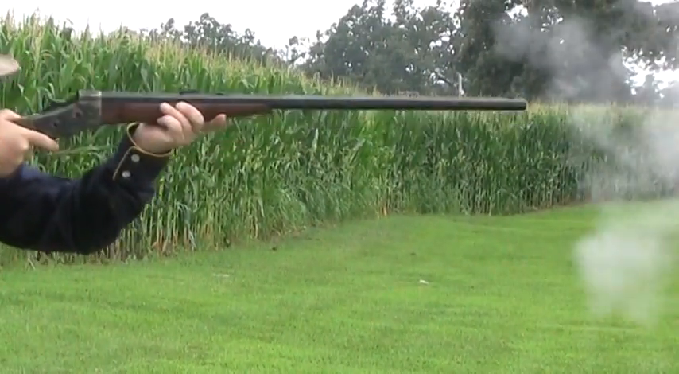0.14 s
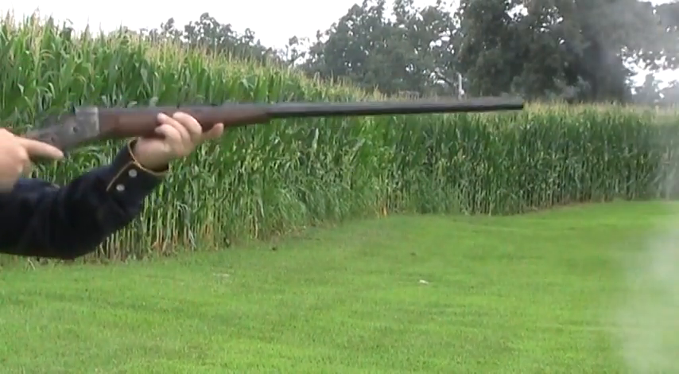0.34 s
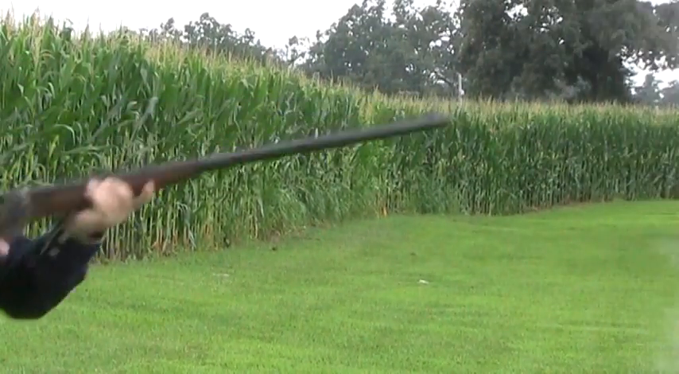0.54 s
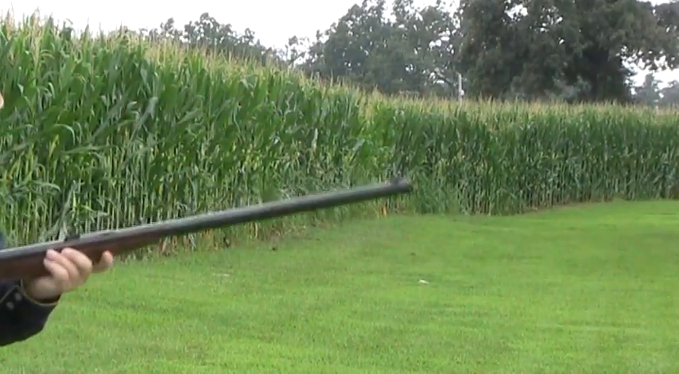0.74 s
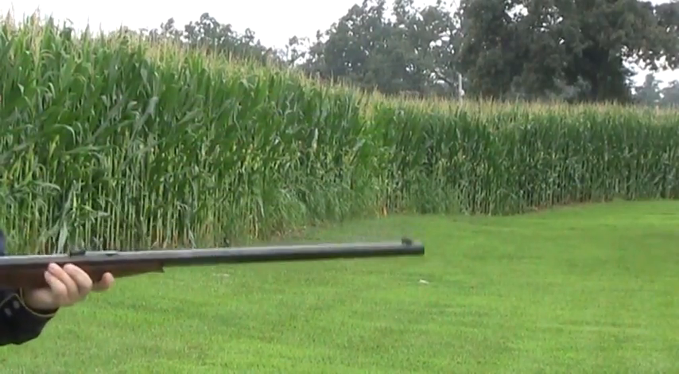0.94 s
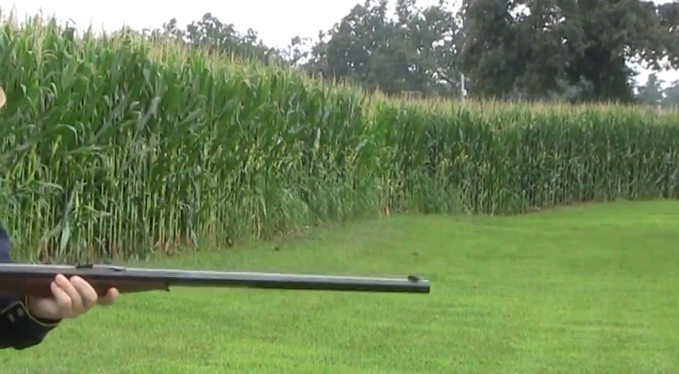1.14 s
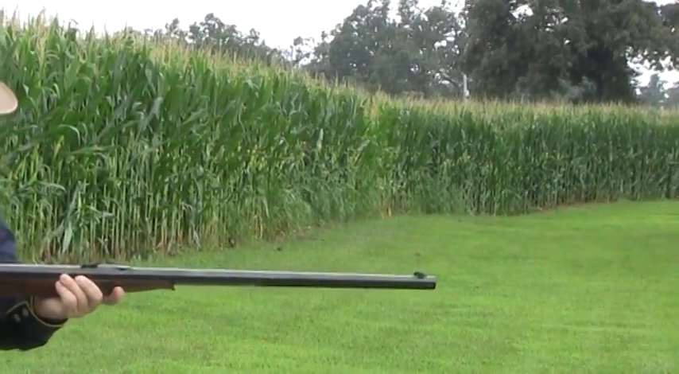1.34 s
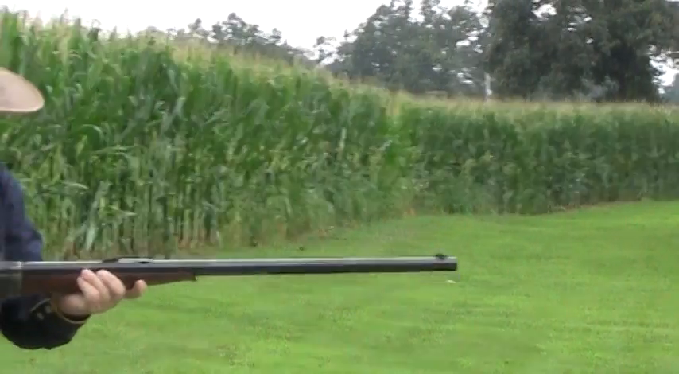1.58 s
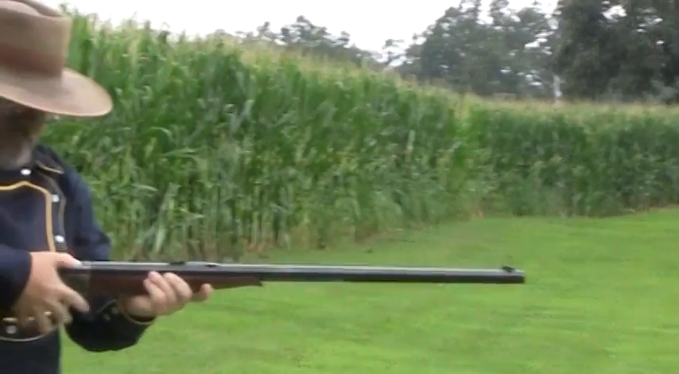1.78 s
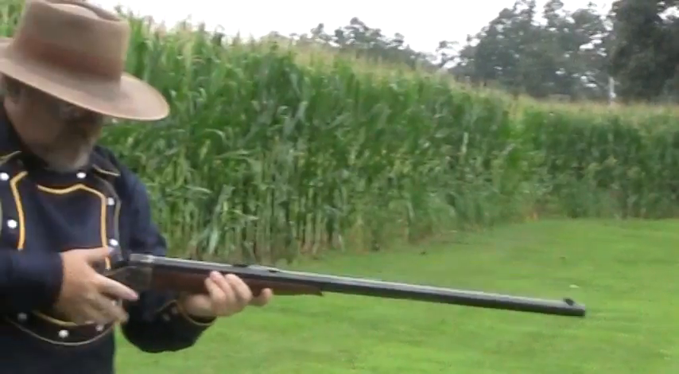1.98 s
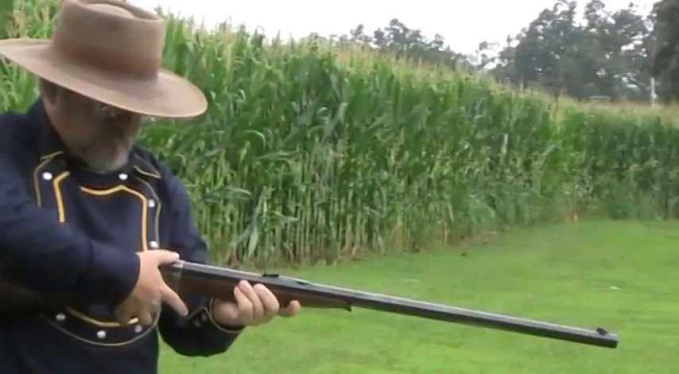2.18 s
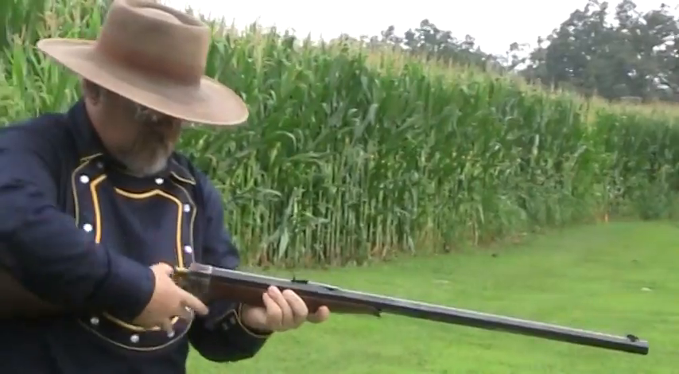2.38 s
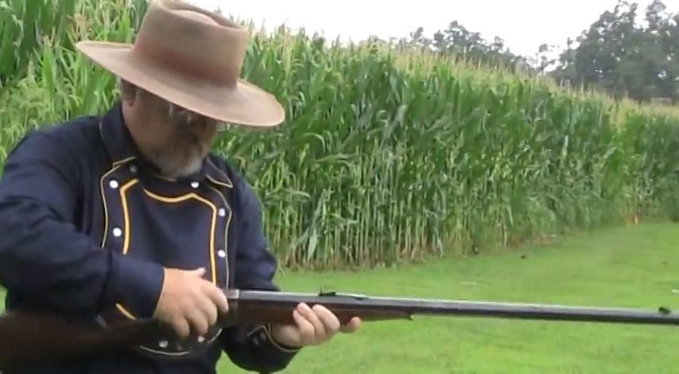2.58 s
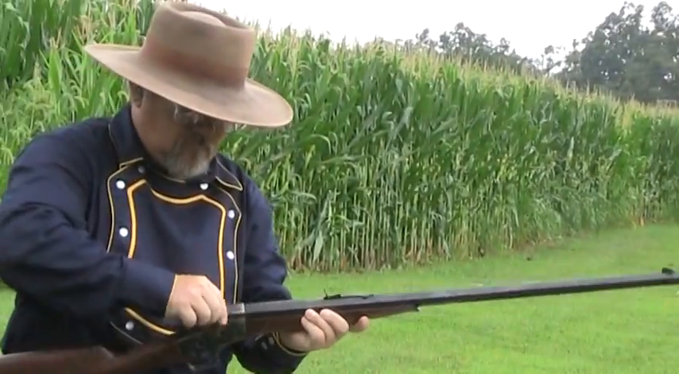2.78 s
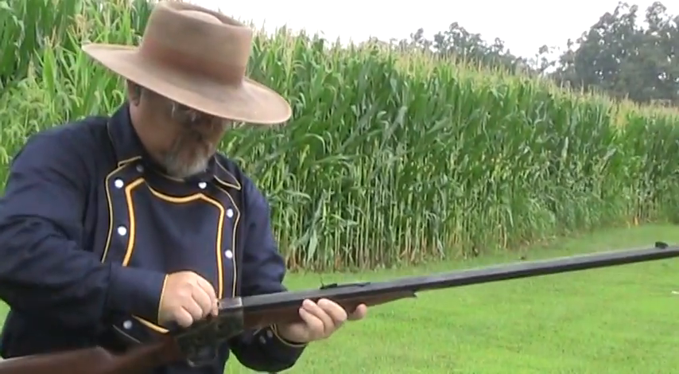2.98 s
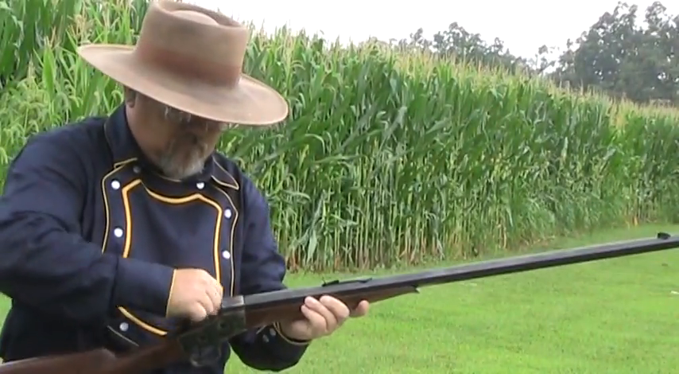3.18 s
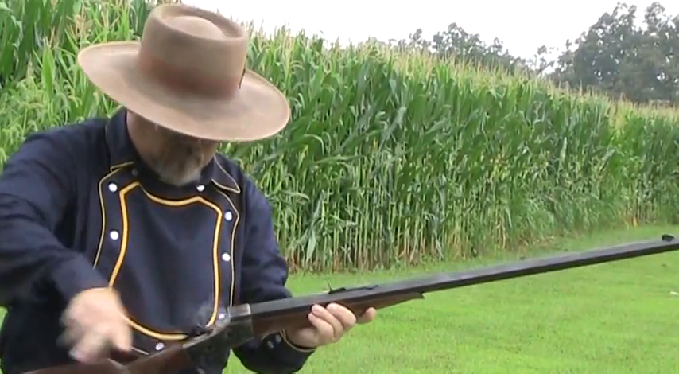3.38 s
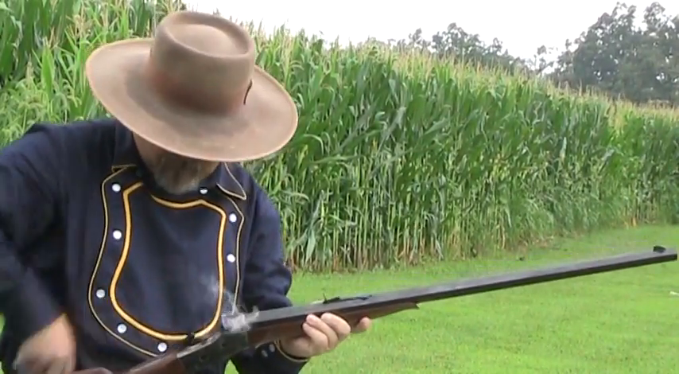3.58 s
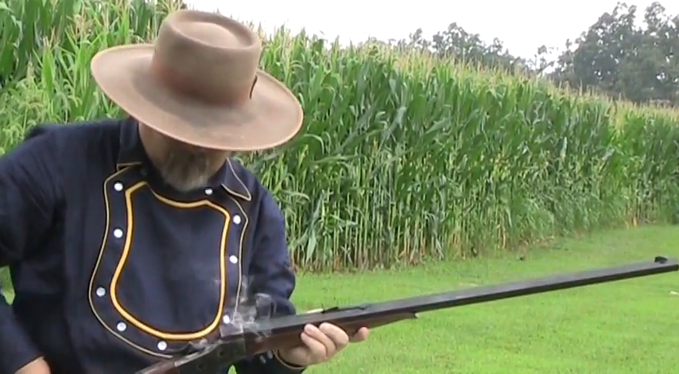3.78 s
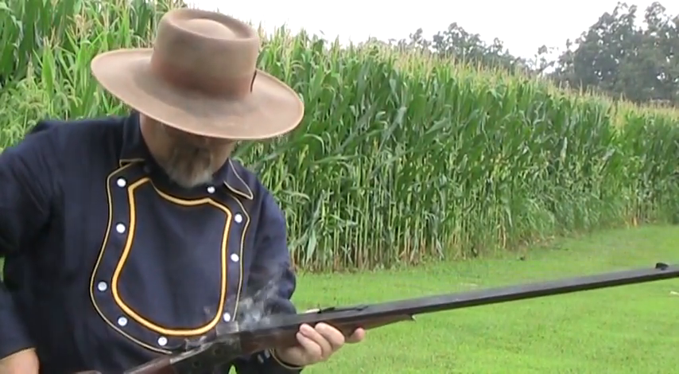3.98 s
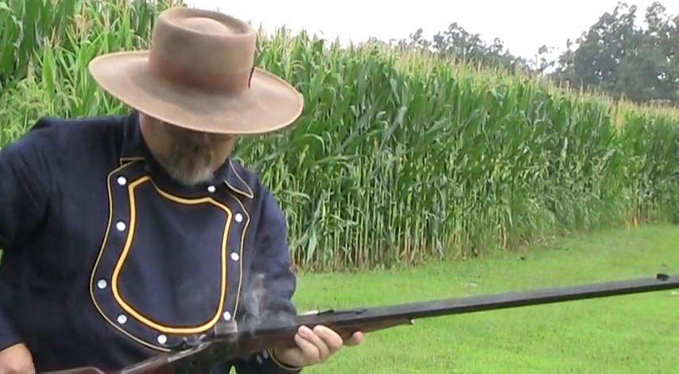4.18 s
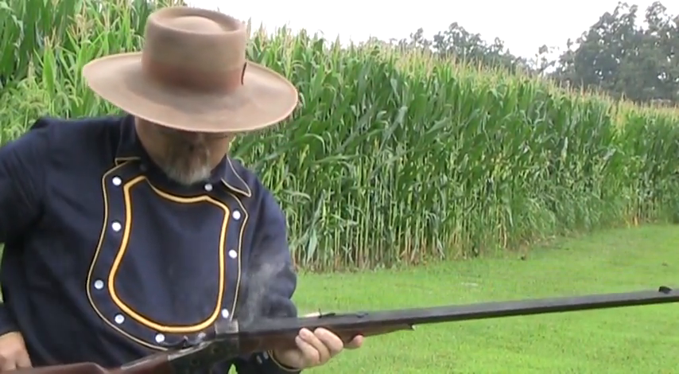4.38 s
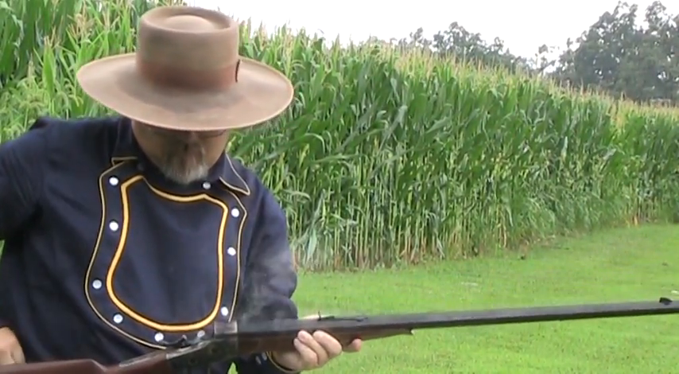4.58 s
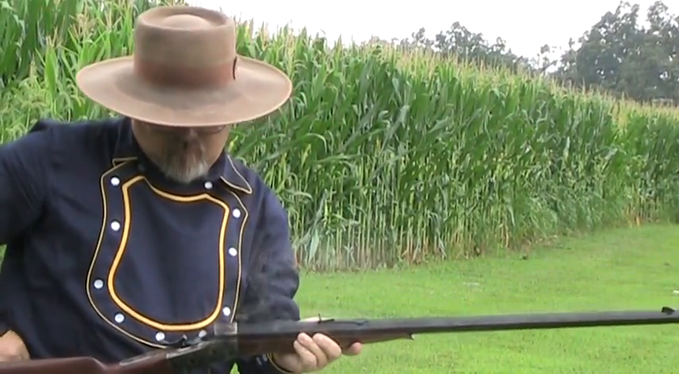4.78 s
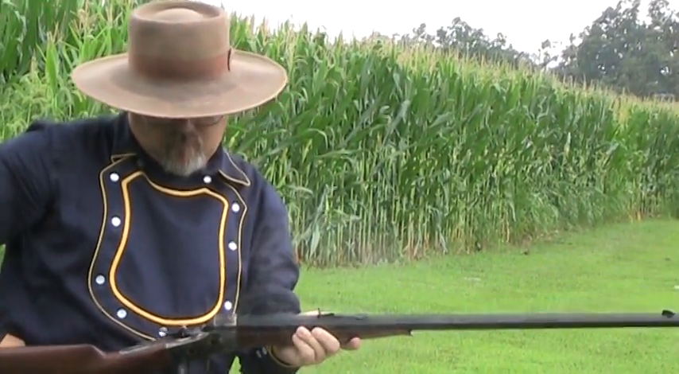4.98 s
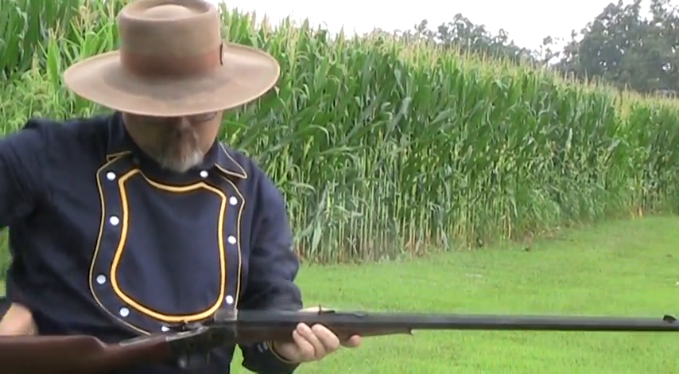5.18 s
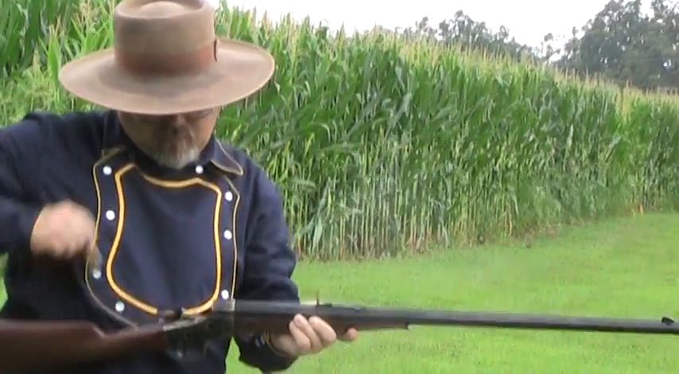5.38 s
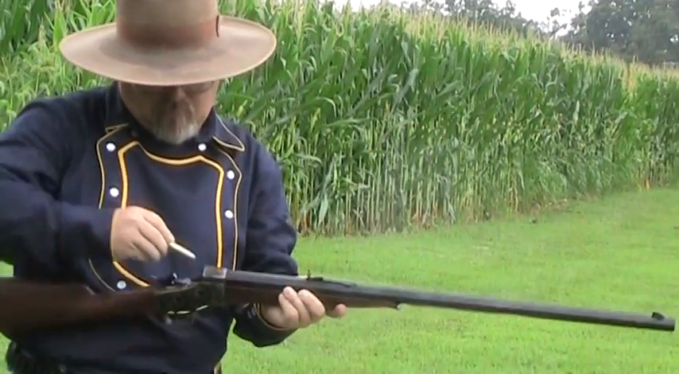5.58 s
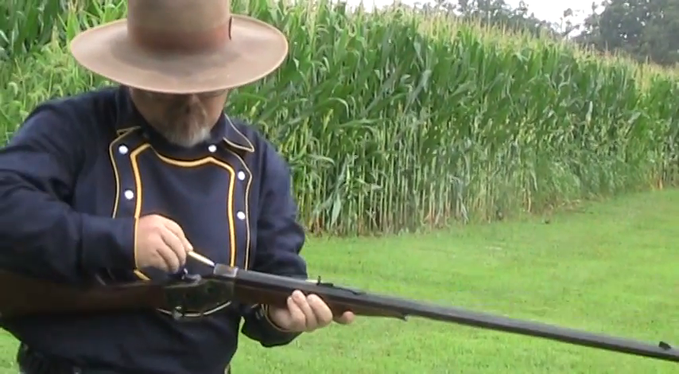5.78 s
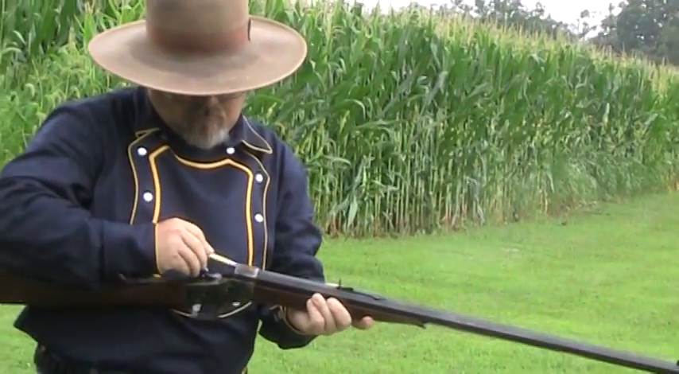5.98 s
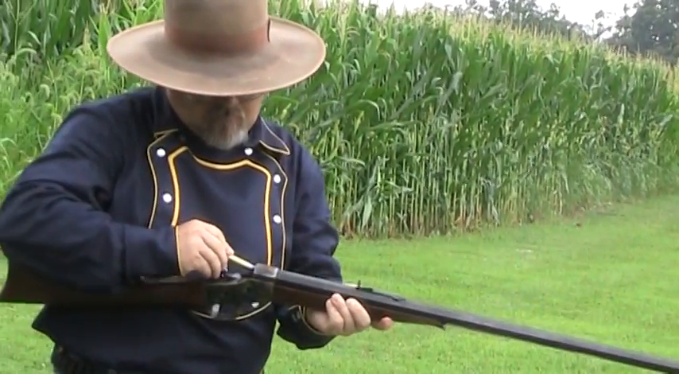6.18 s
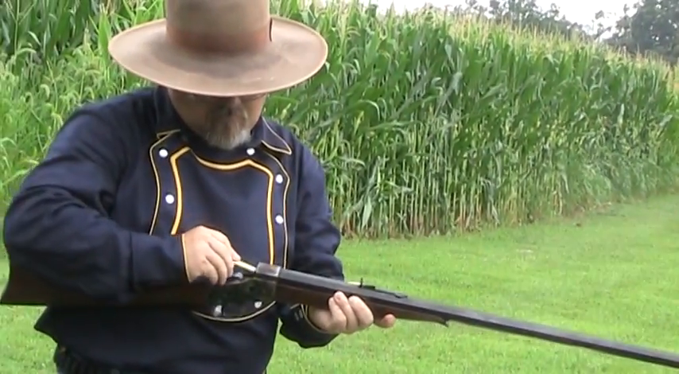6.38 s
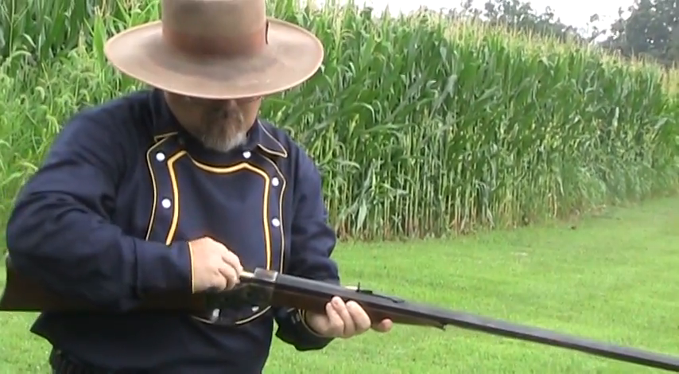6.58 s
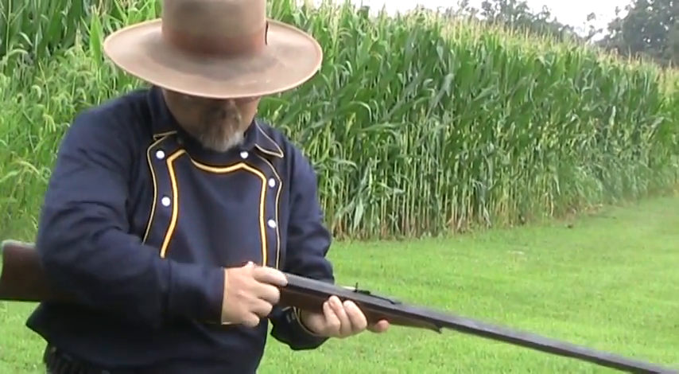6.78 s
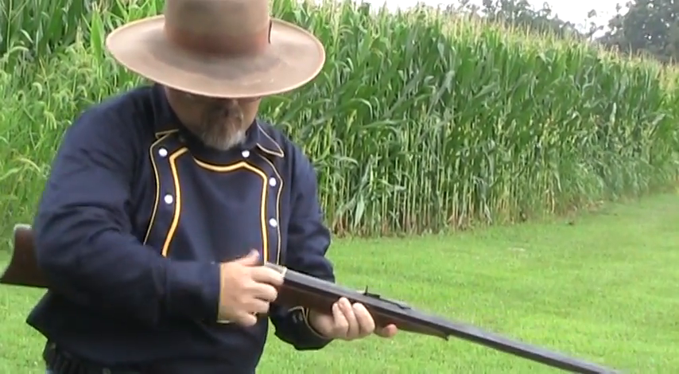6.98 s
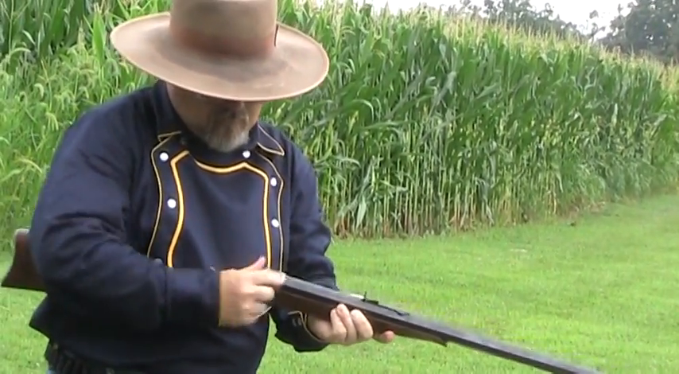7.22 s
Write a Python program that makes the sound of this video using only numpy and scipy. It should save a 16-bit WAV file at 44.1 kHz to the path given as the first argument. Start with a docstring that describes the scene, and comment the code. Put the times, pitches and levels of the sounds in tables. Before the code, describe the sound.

An open grassy field, heard through a small stereo camera microphone with soft wide hiss, a very faint distant hum and quiet pulsing katydids and crickets. At 0.2 seconds one close rifle shot cracks, harsh and clipped flat, with a brief sinking boom. Around 0.35 a short bright steel-target clank lands among hard slaps; dense echoes roll from crops and trees, swelling unevenly near 0.5, 0.75, 1.1 and 1.4, losing treble and fading by 2.4. Crisp action clicks cut through at 1.4 and 1.55, then a strong steel clack at 2.5. At 3.4 metal snaps and the brass case tinks, with a small dull grass thud at 3.9. Faint gliding bird whistles run from 4 to 6, after a lone one at 2. Subtle sliding and rustling begin at 6, with light reload clicks at 6.2, 6.7 and a ringing clack at 6.9, ending near 7.

```python
"""At the edge of a corn field, one rifle shot overloads a small stereo camera microphone. The shot is bursts of noise
and a sinking tone. The bullet rings a steel target, made of dying sines, and noise echoes roll back from crop rows
and far trees. The shooter works the steel action, pulls the brass case and loads again: scrapes and ringing metal.
Behind are katydids and crickets (pulsed hiss), a songbird (gliding sines), soft hiss and a distant hum."""
import sys
import numpy as np
from scipy import signal
from scipy.fft import rfft, irfft
from scipy.io import wavfile
from scipy.ndimage import uniform_filter1d

SR = 44100
rng = np.random.default_rng(int(sys.argv[2]) if len(sys.argv) > 2 else 0)


def transcribe(signal):
    """Save signal, clipped to [-1, 1], as a 16-bit WAV file at the path in sys.argv[1]."""
    frames = np.atleast_2d(signal).T
    limited = np.clip(frames, -1, 1)
    pcm = np.round(limited * 32767).astype(np.int16)
    wavfile.write(sys.argv[1], SR, pcm)


def makeup_ratio(level_db):
    """Linear amplitude ratio for a level in decibels (20 dB per factor of ten)."""
    decades = np.asarray(level_db, float) / 20
    return 10 ** decades


N = 319725
T = np.arange(N) / SR  # time of every sample, s
LR = np.array([[1.], [-1.]])  # puts a signal into left and right with opposite signs

# Rolling echo of the field, level of its middle pitches: t/s, level/dB
ROLL_MIDDLE = [(0.21, -11.5), (0.24, -25), (0.285, -21.5), (0.31, -15), (0.335, -15), (0.37, -29.5),
               (0.43, -25), (0.51, -18), (.55, -23.5), (.59, -21), (0.66, -21), (0.729, -29), (0.733, -21),
               (.8, -22), (0.92, -24), (1.05, -19), (1.2, -19), (1.34, -26), (1.44, -24), (1.5, -28.5),
               (1.77, -37.5), (1.83, -33.5), (1.86, -39.5), (2.45, -59.5)]
# Level of its treble, which air takes away as the path grows: t/s, level/dB
ROLL_TREBLE = [(0.21, -25), (0.3, -28), (0.38, -24.5), (0.602, -29), (0.73, -38), (0.731, -27), (0.92, -40),
               (1.02, -33.5), (1.4, -53.5), (1.78, -59), (1.83, -54.5), (1.87, -63.5), (2.449, -91)]
# Level of its bass: t/s, level/dB
ROLL_BASS = [(0.204, -13.5), (0.28, -37.5), (0.311, -15.5), (0.46, -41), (0.51, -28), (0.6, -37.5),
             (0.9, -39.5), (1.7, -41.5), (2.449, -69.5)]
# Tone colour of the rolling echo: f/Hz, relative level per Hz/dB
ROLL_COLOUR = [(50, -8), (150, 6.5), (350, -0.5), (1100, 0), (2000, -1), (3500, -1.5), (6000, -8),
               (8500, -8), (12500, -41)]
# Single slaps from hard surfaces: t/s, peak level before panning/dB, centre f/Hz
SLAPS = [(.262, -7.5, 1500), (0.2963, -2, 1280), (0.3225, -5, 680), (0.330, -7.5, 770), (0.3486, 5, 1880),
         (0.3907, 0, 1030), (0.4125, 0, 999), (0.4264, -2.5, 1248), (0.733, -11, 2620), (0.744, -7.5, 1620),
         (1.018, -6.5, 970), (1.026, -6.5, 1040), (1.051, -8, 1030), (1.08, -5, 1010), (1.101, -10, 1060),
         (1.156, -6.5, 1110), (1.423, -8, 980)]
# Ringing tones of the steel plate: f/Hz, relative level/dB, time to fall by 60 dB/s
TARGET_MODES = [(3680, -12.5, 0.21), (5350, 0, 0.039), (7300, -18.5, 0.17), (8700, -21, 0.08)]
# The hit and its two duller echoes: t/s, peak level before panning/dB, brightness/dB per octave
TARGET_HITS = [(.349, 4, 2.5), (.511, -15.5, -22.5), (0.591, -15, -27)]
# Ringing tones of barrel and action: f/Hz, relative level/dB, time to fall by 60 dB/s
RIFLE_MODES = [(440, -18.5, 0.031), (803, -12.5, 0.27), (1062, -4.5, 0.033), (1390, -7, 0.051),
               (1774, -10, 0.022), (2205, -10.5, 0.077), (2770, -9, 0.04), (3380, -4.5, 0.026),
               (4820, -10.5, 0.0051), (6560, -11, 0.028), (7870, -3.5, 0.015), (9386, -4, 0.015),
               (12900, -17.5, 0.023)]
# Hands, block, hammer and cartridge on the rifle:
# t/s, peak level/dB, brightness/dB per octave, barrel ring/dB, favoured f/Hz
CONTACTS = [(.033, -36.5, -19, -11, 1390), (0.1815, -7.5, 0, 5, 2205), (1.3918, -8, 1.5, -15, 4820),
            (1.56, -10, 0, -8, 2205), (2.478, -37, 5, -18.5, 7870), (2.4912, -22, 2, -7, 3100),
            (2.502, -4, -0.5, -10, 2640), (2.646, -31, 0.5, 3.5, 1774), (3.118, -30.5, 0.5, 4, 1390),
            (3.4078, -12.5, 1.5, -10, 12900), (3.4137, -24, -4, -17, 2205), (3.4233, -17, -2.5, -1, 2205),
            (3.835, -40, -9, -7.5, 1062), (3.881, -32.5, 2, -17.5, 4820), (5.390, -37, -0.5, -9, 1062),
            (6.183, -23.5, -0.5, -7, 1774), (6.484, -31.5, -5, 3, 1390), (6.543, -32.5, -5.5, 4, 1390),
            (6.682, -17.5, -1.5, -9.5, 2780), (6.741, -34.5, -6.5, -5, 424), (6.887, -33, -3, 7, 1390),
            (6.9121, -21.5, 1.5, 7, 2770), (6.916, -14.5, -3.5, 9, 1390), (6.979, -38, -5.5, -17, 2205)]
# Ringing tones of the empty brass case: f/Hz, relative level/dB, time to fall by 60 dB/s
CASE_MODES = [(4064, -10, 0.2), (8730, -2.5, 0.13), (13600, -19.5, 0.14)]
# Knocks of the case: t/s, peak level/dB, brightness/dB per octave
CASE_HITS = [(3.4232, -25, 3), (3.4264, -23.5, -3), (3.438, -28, -4.5)]
# The case lands in the grass: t/s, level/dB, f/Hz
THUD = (3.888, -25, 354)
# Fingers and brass slide on the steel: start t/s, length/s, gain of the ringing ticks/dB, favoured f/Hz
SLIDES = [(2.453, 0.055, -39.5, 803), (5.356, 0.069, -51, 1062), (6.02, 0.41, -60, 803),
          (6.479, 0.11, -47.5, 1390), (6.807, 0.078, -48.5, 803)]
# Faint rustle of sleeve or leaves: start t/s, length/s, level before its swell/dB, f/Hz
RUSTLES = [(6.032, 0.089, -58, 4600), (6.814, 0.09, -57.5, 4140), (7.109, 0.12, -56.5, 4740)]
# The repeated falling note of the bird: length/s, start f/Hz, end f/Hz
FALLING_NOTE = (0.054, 4500, 3400)
# Its other notes: t/s, length/s, start f/Hz, end f/Hz, level before panning and flutter/dB
OTHER_NOTES = [(2.038, 0.15, 3364, 3314, -66.5), (4.456, 0.021, 3120, 3130, -63.5),
               (4.915, 0.059, 6300, 3610, -60), (5.043, 0.046, 3630, 4125, -54),
               (5.212, 0.055, 5910, 3325, -61.5), (5.328, 0.065, 3500, 4136, -56.5),
               (5.495, 0.095, 3500, 5750, -63), (5.63, 0.044, 4900, 5750, -59.5),
               (5.705, .04, 5680, 5750, -59.5), (5.645, 0.064, 3460, 5265, -57.5),
               (5.775, 0.065, 4600, 5780, -65), (5.846, 0.021, 4693, 3170, -55.5),
               (5.917, 0.068, 3106, 3240, -61)]
# Phrases of the near katydid: first t/s, until t/s, spacing/s
NEAR_KATYDID = [(.045, .1, .25), (1.48, 2.85, .257), (3.11, 6.15, .248), (6.275, 7.3, .2235)]
# Phrase of the second katydid: first t/s, until t/s, spacing/s
SECOND_KATYDID = [(1.88, 7.3, .2345)]
# Phrase of the far katydid: first t/s, until t/s, spacing/s
FAR_KATYDID = [(.23, 7.3, .247)]
# Cricket choruses: f/Hz, width/Hz, pulses per s, level/dB
CRICKETS = [(4700, 350, 62, -67), (6300, 750, 140, -67)]
# Bands of the distant hum: f/Hz, width/Hz, level/dB
HUM_BANDS = [(234.8, 10, -58.5), (141, 24, -66)]
# Tone colour of air and microphone hiss, part shared by both sides: f/Hz, relative level per Hz/dB
HISS_SHARED = [(40, -12), (100, -3), (250, -8), (600, -13), (1800, -20.5), (6800, -28), (7300, -31),
               (10300, -33), (11000, -40), (15500, -42), (16500, -79)]
# Opposed part of the hiss over its shared part: f/Hz, level/dB
HISS_OPPOSED = [(100, -1.5), (600, 4.5), (5000, 2.5)]


def level(x, db):
    """Scale a sound to a given average (rms) level."""
    return x * makeup_ratio(db) / np.sqrt(np.mean(x ** 2))


def band(x, hz, width_hz):
    """Keep only the pitches around a centre."""
    middle = np.hypot(hz, width_hz / 2)
    edges = np.clip([middle - width_hz / 2, middle + width_hz / 2], 10, .48 * SR)
    return signal.sosfilt(signal.butter(2, edges, "bandpass", fs=SR, output="sos"), x)


def colour_db(points, hz):
    """Read a tone colour between its points, with pitch counted in octaves."""
    f, db = np.transpose(points)
    return np.interp(np.log(np.maximum(hz, 1)), np.log(f), db)


def coloured(db_of_hz):
    """Steady noise with a given tone colour."""
    spectrum = rfft(rng.standard_normal(N))
    return irfft(spectrum * makeup_ratio(db_of_hz(np.fft.rfftfreq(N, 1 / SR))), N)


def add(out, s, x):
    """Mix a sound in at a given time."""
    i = int(s * SR)
    n = min(x.shape[-1], N - i)
    out[..., i:i + n] += x[..., :n]


def spread(x, pan_db, lag):
    """Two microphone openings: they differ in level, and the left one hears the sound lag samples later."""
    return np.array([np.roll(x, lag) * makeup_ratio(pan_db / 2), x * makeup_ratio(-pan_db / 2)])


def ring(modes, gains_db, length=.35):
    """Ringing metal: dying sines, each gently pulsing in loudness from a random start; highest peak is 1."""
    t = np.arange(int(length * SR))[:, None] / SR
    hz, db, t60 = np.transpose(modes)
    beat_hz = 40 * rng.random(len(hz))
    beat = 1 + 0.36 * np.sin(2 * np.pi * (beat_hz * t + rng.random(len(hz))))
    decay = np.exp(-np.log(1000) * t / t60)
    tones = np.sin(2 * np.pi * (hz * t + rng.random(len(hz))))
    x = (beat * makeup_ratio(db + gains_db) * decay * tones).sum(axis=1)
    return x / np.abs(x).max()


def struck(modes, hits, stops=False):
    """A metal thing struck at listed moments; with stops, each contact silences the ring before it."""
    out = np.zeros(N)
    for s, db, bright_db in hits:
        stopped = np.clip((T - s) / 0.0036 + 1, 0, 1)  # fades the old ring over the last 3.6 ms
        out = out * (1 - stops * stopped)
        gains_db = bright_db * np.log2(np.array(modes)[:, 0] / 5000)
        add(out, s, makeup_ratio(db) * ring(modes, gains_db))
    return out


def favour_db(hz, favoured_hz):
    """The spot that is hit lifts the ringing tones near one pitch, by up to 10 dB."""
    width_octaves = .15
    return 10 * np.exp(-(np.log2(hz / favoured_hz) / width_octaves) ** 2)


def shot():
    """Turbulent muzzle gas: a bright crack, then a cloud whose boom sinks in pitch as it grows."""
    start_s, gain_db = .187, 24.5
    t = np.arange(int(.12 * SR)) / SR
    gas = rng.standard_normal((3, len(t)))
    crack = level(band(gas[0] + 0.67 * LR * gas[1], 3000, 7500), 0)
    crack = crack * (np.exp(-t / 0.0035) + makeup_ratio(-33) * np.exp(-t / 0.029))
    body = level(band(gas[2], 700, 1800), -2.5) * np.exp(-t / 0.0049)
    boom_hz = 390 + 900 * np.exp(-t / .0025)
    boom_swell = (t / 0.0076) * np.exp(1 - t / 0.0064) * np.exp(-t / 0.0043)
    boom = makeup_ratio(4.5) * np.sin(2 * np.pi * np.cumsum(boom_hz) / SR) * boom_swell
    out = np.zeros((2, N))
    add(out, start_s, makeup_ratio(gain_db) * (crack + body + boom))
    return out


def slaps():
    """Each hard surface returns the blast as a few cycles in a broad band, with a ragged tail."""
    t = np.arange(int(.03 * SR)) / SR
    out = np.zeros(N)
    for s, db, hz in SLAPS:
        blast = rng.standard_normal(len(t)) * 0.19 * np.exp(-t / 0.004)
        blast[0] = 1
        main = band(band(blast, hz, 0.51 * hz), hz, 5.1 * hz)
        upper = band(band(blast, 2.5 * hz, 2 * hz), 2.5 * hz, 2 * hz)
        x = main + makeup_ratio(-16) * upper
        add(out, s, x * makeup_ratio(db) / np.abs(x).max())
    return spread(out, -4.0, lag=1)


def roll():
    """Countless small reflections of uneven size, as noise in half-octave bands; treble comes from all sides."""
    t = T[:int(ROLL_MIDDLE[-1][0] * SR)]
    curves = (ROLL_MIDDLE, ROLL_TREBLE, ROLL_BASS)
    middle_db, treble_db, bass_db = (np.interp(t, *np.transpose(c), left=-120) for c in curves)
    clumps_db = level(uniform_filter1d(rng.standard_normal(len(t)), int(0.0056 * SR)), 0)
    clumps_db = clumps_db * np.clip(t - 0.2, .55, 1)  # far trees return lumpier echoes than crop rows
    out = np.zeros((2, N))
    for hz in 60 * 2 ** np.arange(0, 8, .5):
        noises = rng.standard_normal((2, len(t)))
        shared, opposed = (level(band(band(x, hz, hz / 2), hz, hz / 2), 0) for x in noises)
        octaves = np.log2(hz / 1400)
        tilt_db = (treble_db - middle_db) * max(octaves + 0.33, 0) / 1.944
        tilt_db = tilt_db + (bass_db - middle_db) * np.clip(-(octaves + 0.46) / 1.47, 0, 1)
        band_db = colour_db(ROLL_COLOUR, hz) + 10 * np.log10(hz / 3100)  # wider bands hold more power
        gain = makeup_ratio(clumps_db * np.clip(2.0 - 1.1 * octaves, 0, 3) + middle_db + tilt_db + band_db)
        width = np.clip(.12 + hz / 9000, 0, 1)
        add(out, 0, gain * (spread(shared, -1.7, lag=1) + width * LR * opposed))
    return out


def steel_target():
    """The bullet makes the steel plate ring, and two duller echoes follow."""
    return spread(struck(TARGET_MODES, TARGET_HITS), -1.3, lag=1)


def working():
    """Each contact is a short scrape of steel that excites the rifle's ringing tones unevenly."""
    hz = np.array(RIFLE_MODES)[:, 0]
    bending = hz == hz[1]  # the long barrel's own tone
    t = np.arange(int(.35 * SR)) / SR
    out = np.zeros((2, N))
    for s, db, bright_db, barrel_db, favoured_hz in CONTACTS:
        gains_db = bright_db * np.log2(hz / 2500) + 0.94 * rng.standard_normal(len(hz))
        gains_db = gains_db + barrel_db * bending + favour_db(hz, favoured_hz)
        scrape = rng.standard_normal((2, len(t))) * (np.exp(-t / 0.003) + makeup_ratio(-23) * np.exp(-t / 0.032))
        chatter_db = 3.7 * np.repeat(rng.standard_normal(len(t) // 40 + 1), 40)[:len(t)]
        scrape = scrape * makeup_ratio(chatter_db)  # rough faces chatter
        crack_hz = 3500 * 2 ** np.clip(bright_db / 4, -2, 1.2)
        crack = band(scrape[0] + 0.25 * LR * scrape[1], crack_hz, 1.4 * crack_hz)
        x = ring(RIFLE_MODES, gains_db) + makeup_ratio(0.7) * crack / np.abs(crack).max()
        x = x * (1 - np.exp(-t / 0.00013))  # the parts meet within a millisecond
        add(out, s, x * makeup_ratio(db) / np.abs(x).max())
    return out


def brass_case():
    """The empty case rings until its next knock stops it, then lands in the grass with a short low thud."""
    out = struck(CASE_MODES, CASE_HITS, stops=True)
    t = np.arange(int(.35 * SR)) / SR
    s, db, thud_hz = THUD
    swell = (t / 0.0014) * np.exp(1 - t / 0.0013)
    add(out, s, makeup_ratio(db) * np.sin(2 * np.pi * thud_hz * t) * swell)
    return out


def fumbling():
    """Dense tiny ticks of uneven size ring the rifle while the hands move; a rustle comes and goes."""
    ticks_per_s = 400
    chance, size = rng.random(N), rng.exponential(size=N)
    ticks = (chance < ticks_per_s / SR) * makeup_ratio(1.1 * size)
    hz, out = np.array(RIFLE_MODES)[:, 0], np.zeros(N)
    for s, length, db, favoured_hz in SLIDES:
        held = ring(RIFLE_MODES, -2.5 * np.log2(hz / 2500) + favour_db(hz, favoured_hz))
        held = held * np.exp(-T[:len(held)] / .03)  # the grip damps the ring
        moving = np.hanning(int(length * SR))
        touches = moving * ticks[int(s * SR):][:len(moving)]
        add(out, s, makeup_ratio(db) * signal.fftconvolve(touches, held))
    for s, length, db, hz in RUSTLES:
        moving = np.hanning(int(length * SR))
        rough = ticks[:len(moving)] + 0.34 * rng.standard_normal(len(moving))
        add(out, s, moving * level(band(rough, hz, hz / 3), db))
    return out


def bird():
    """Near-sine whistles that glide to their last pitch, returned once by the tree line."""
    run_start_s, run_every_s, run_db = 4.0225, .2325, [-60, -53, -51, -53.5]  # evenly repeated falling note
    fall_bend, rise_bend = 1.15, 2.7  # a glide slows towards its last pitch; 1 is straight
    echo_s, echo_db = 0.12, -7.5
    out = np.zeros((2, N))
    run = [(run_start_s + k * run_every_s, *FALLING_NOTE, db) for k, db in enumerate(run_db)]
    for s, length, hz0, hz1, db in run + OTHER_NOTES:
        u = np.linspace(0, 1, int(length * SR))  # progress through the note
        hz = hz1 + (hz0 - hz1) * (1 - u) ** (fall_bend if hz0 > hz1 else rise_bend)
        swell = np.sin(np.pi * u) ** 0.41
        note = np.sqrt(2) * makeup_ratio(db) * swell * np.sin(2 * np.pi * np.cumsum(hz) / SR)
        flutter_db = 3.9 * level(uniform_filter1d(rng.standard_normal(SR // 5), SR // 200), 0)
        note = note * makeup_ratio(flutter_db[:len(u)])  # moving air makes it flutter
        add(out, s, spread(note, 10.0, lag=-1))
        add(out, s + echo_s, makeup_ratio(echo_db) * spread(note, 1.2, lag=2))
        # leaves scatter the note into a blurred halo
        blur = rng.standard_normal((2, SR // 8)) * np.exp(-T[:SR // 8] / 0.074)
        add(out, s, makeup_ratio(-36.5) * signal.fftconvolve(note[None], blur))
    return out


def rasp(hz, width_hz, rate, depth):
    """Wing strokes: a narrow hiss pulsed at the stroke rate, which wanders a little."""
    wander = level(uniform_filter1d(rng.standard_normal(N), SR // 5), 0)
    stroke_hz = rate * (1 + 0.052 * wander)
    strokes = 1 - depth * np.sin(np.pi * np.cumsum(stroke_hz) / SR) ** 2
    shared, opposed = band(rng.standard_normal((2, N)), hz, width_hz)
    return level(strokes * (shared + LR * opposed), 0)


def bursts(phrases, length, db):
    """Loudness of soft-edged bursts at an even pace, each a little louder or softer."""
    out = np.zeros(N)
    for first, until, every in phrases:
        times = np.arange(first, min(until, N / SR), every)
        for s, chance in zip(times, rng.standard_normal(size=40)):
            burst = signal.windows.tukey(int(length * SR), .7)
            add(out, max(s - length / 2, 0), makeup_ratio(db + 1.6 * chance) * burst)
    return out


def katydids():
    """Three katydids rub their wings in bursts of rasping; others of their kind fill the pauses."""
    near = bursts(NEAR_KATYDID, 0.11, db=-63) + bursts(SECOND_KATYDID, 0.056, db=-68) + makeup_ratio(-70)
    far = bursts(FAR_KATYDID, 0.16, db=-72.5) + makeup_ratio(-71)
    return near * rasp(9800, 330, 100, depth=0.55) + far * rasp(8850, 450, 115, depth=.8)


def crickets():
    """Two steady choruses, each a narrow hiss pulsed by wing strokes."""
    return sum(makeup_ratio(db) * rasp(hz, width_hz, rate, depth=0.97) for hz, width_hz, rate, db in CRICKETS)


def hum():
    """A distant machine: narrow bands of noise, heard as a wavering hum."""
    return sum(level(band(rng.standard_normal(N), hz, width_hz), db) for hz, width_hz, db in HUM_BANDS)


def hiss():
    """Air and microphone noise, mostly wider than it is central."""
    shared = coloured(lambda hz: colour_db(HISS_SHARED, hz))
    opposed = coloured(lambda hz: colour_db(HISS_SHARED, hz) + colour_db(HISS_OPPOSED, hz))
    return level(shared + LR * opposed, -47.5)


def scene():
    """Everything that reaches the microphone."""
    blast = shot() + slaps() + roll() + steel_target()
    handling = working() + brass_case() + fumbling()
    background = bird() + katydids() + crickets() + hum() + hiss()
    return blast + handling + background


def top_cut(x):
    """Nothing passes above the cut-off."""
    return signal.sosfilt(signal.butter(12, 20000, fs=SR, output="sos"), x)


def record(dry):
    """The input stage cuts the waveform flat at full scale."""
    mix = np.clip(dry, -1, 1)
    return top_cut(mix)


dry = scene()
out = record(dry)
transcribe(out)
```